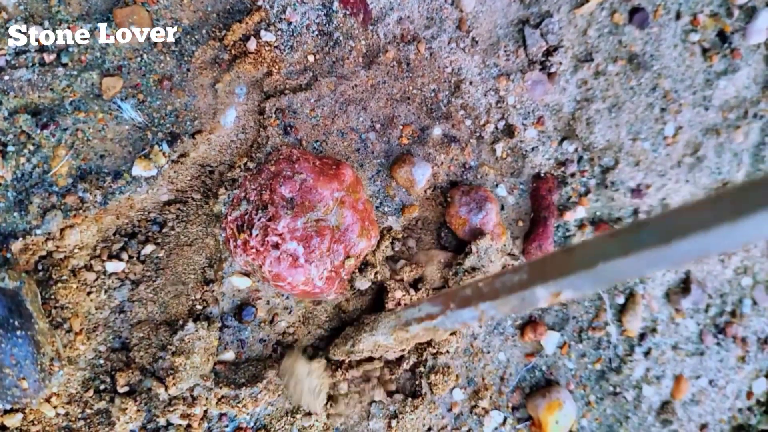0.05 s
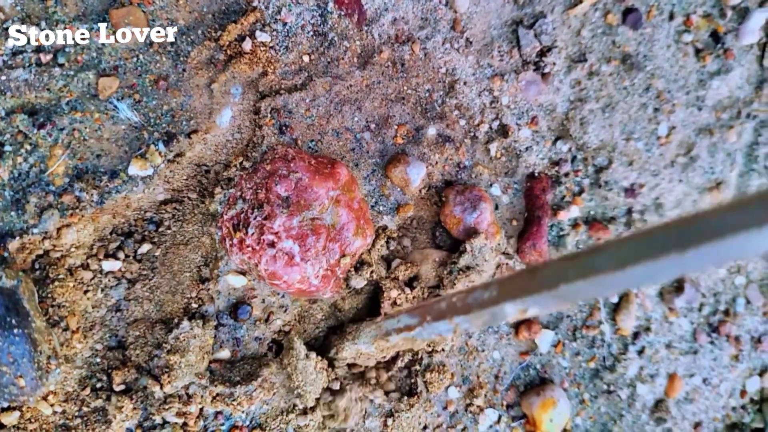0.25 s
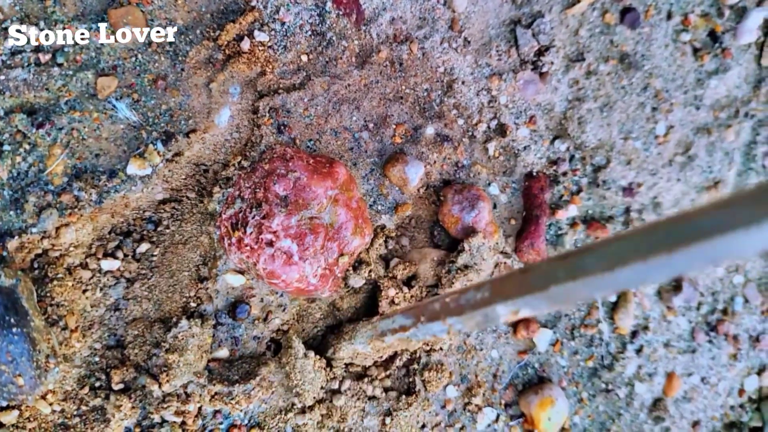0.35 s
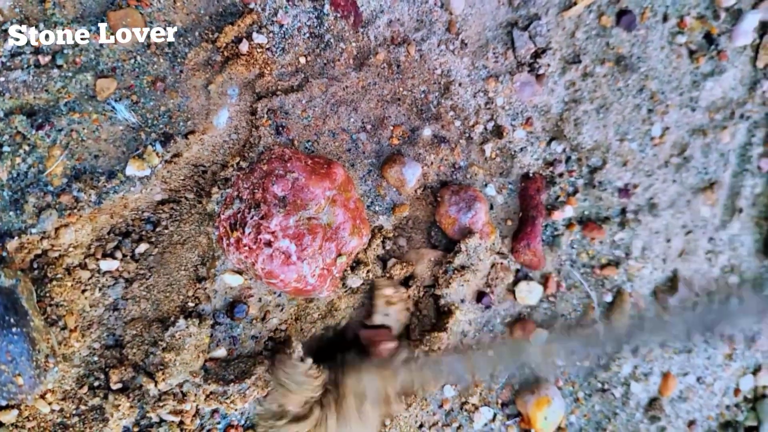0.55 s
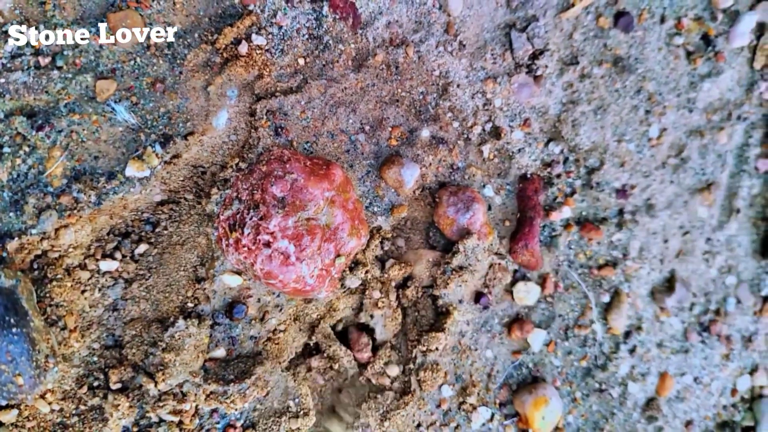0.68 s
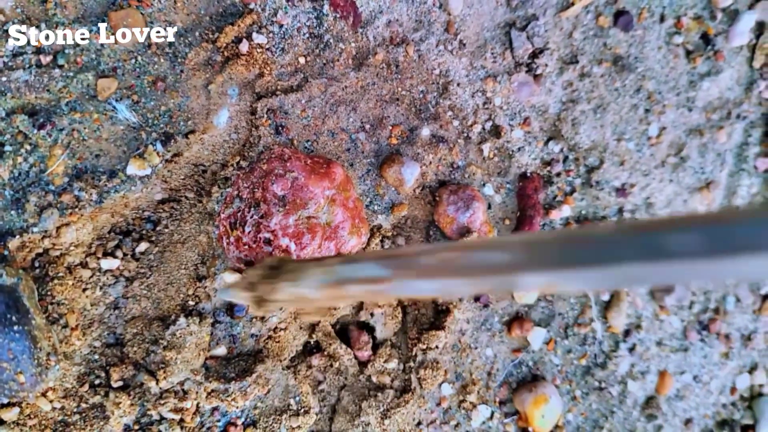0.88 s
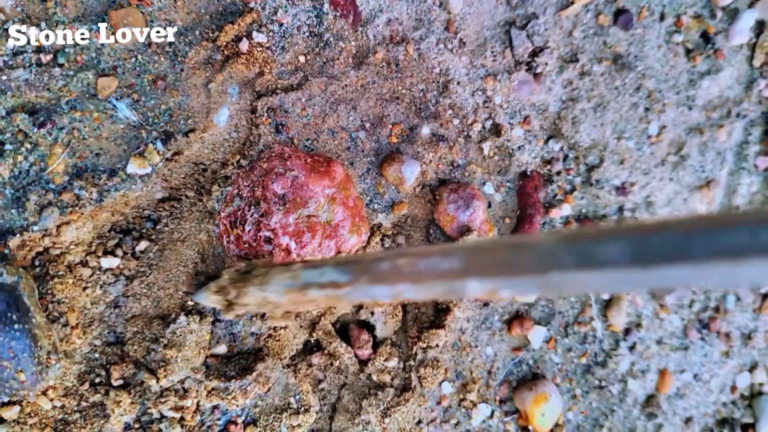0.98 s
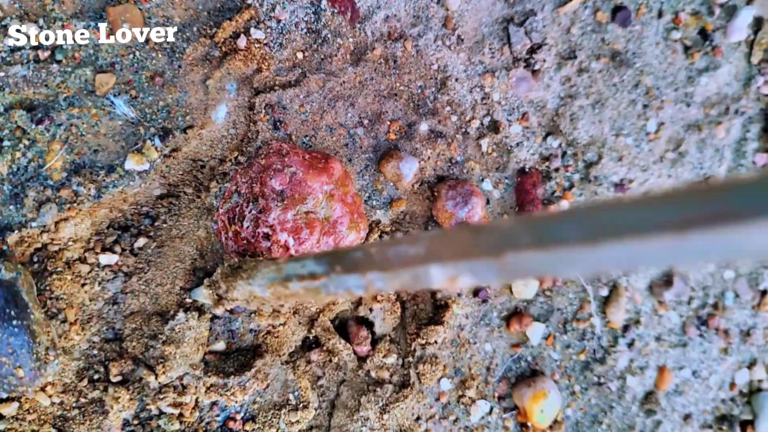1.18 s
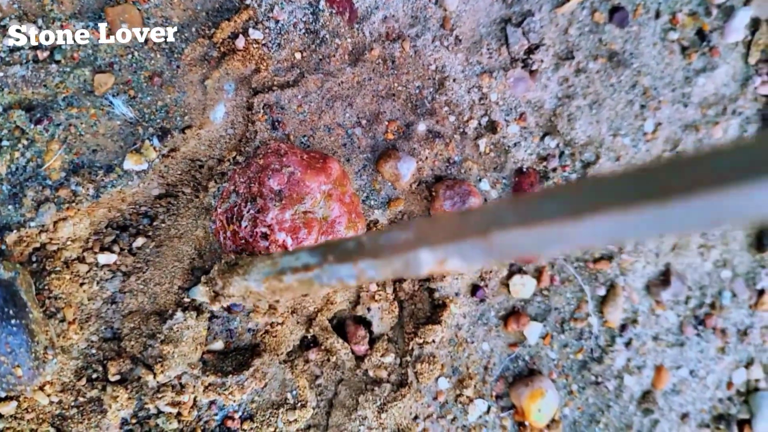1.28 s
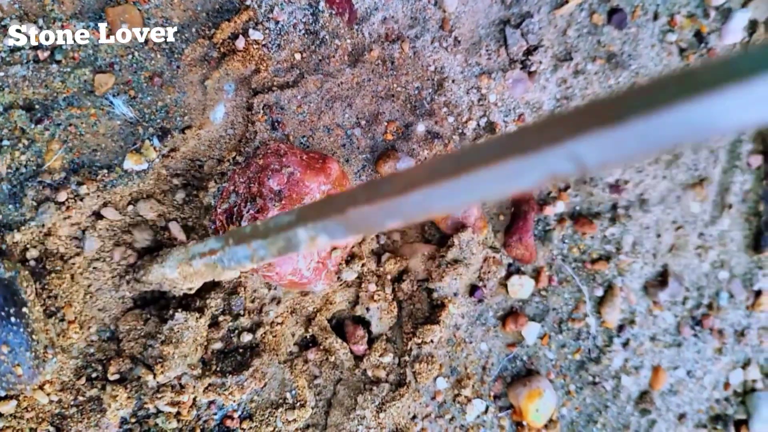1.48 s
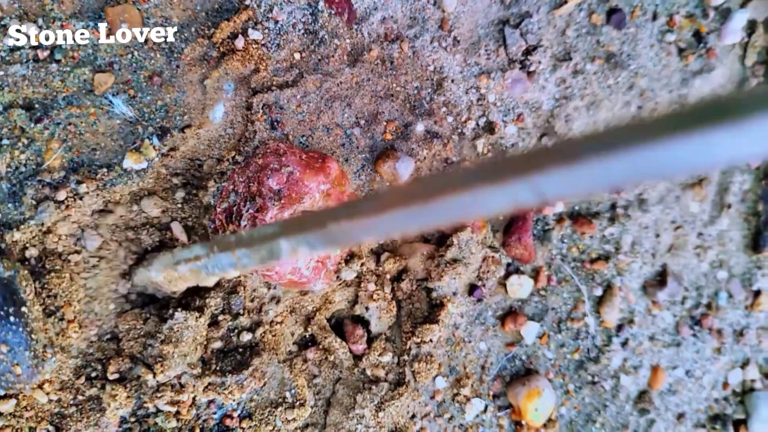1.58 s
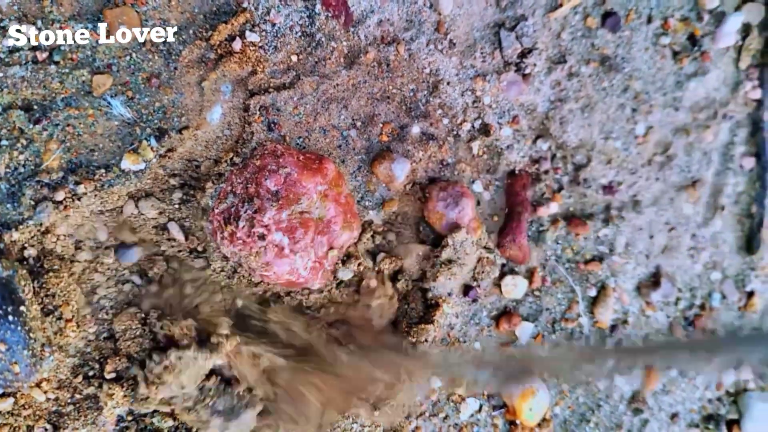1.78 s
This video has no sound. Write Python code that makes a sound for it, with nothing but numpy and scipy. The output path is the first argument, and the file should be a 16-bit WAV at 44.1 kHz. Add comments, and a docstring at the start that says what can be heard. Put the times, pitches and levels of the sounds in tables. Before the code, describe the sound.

Close digging with a metal rod in sandy ground: two pairs of sharp, gritty strikes with soft thuds, about a second apart. Between them the tip drags quietly, clumps break and loose grains tick down, against quiet outdoor air.

```python
"""Outdoors, close up: a steel rod digs in damp, gritty sand.
It stabs four times, each a few hard, ringing contacts with grit over a dull thud of the ground.
In between, the tip drags and judders through the sand, clods crumble with a hollow note,
and loose grains tick and trickle down. Still air and two faint whistles lie behind."""
import sys
import numpy as np
from scipy import signal
from scipy.fft import rfft, irfft
from scipy.io import wavfile
from scipy.ndimage import uniform_filter1d

SR = 44100
rng = np.random.default_rng(int(sys.argv[2]) if len(sys.argv) > 2 else 0)


def generate_wav(sig):
    """Save sig (samples, or channels by samples) to the path in sys.argv[1] as 16-bit PCM at SR."""
    pcm = np.round(np.clip(np.atleast_2d(sig).T, -1, 1) * 32767).astype(np.int16)
    wavfile.write(sys.argv[1], SR, pcm)


N = 81585
TIME = np.arange(N) / SR

# the ground gives under each stab: (time [s], push level [dB], push length [s], spring-back [Hz],
# knock level [dB], knock pitch [Hz], loose sand that the tip meets first [dB])
STAB_THUDS = [(0.2314, -24.5, 0.0072, 22.04, -29.5, 617, -33.5),
              (0.4202, -13.5, .006, 29.92, -23, 918, -40.5), (1.3029, -15.5, 0.0064, 27.56, -41, 246, -34),
              (1.5577, -12.5, 0.00513, 36, -33.5, 703, -39)]
# the rod's modes, damped by the sand: (pitch [Hz], level [dB], t60 [s])
ROD_MODES = [(624, -29, 0.01), (963, -27, 0.018), (1239, -23, .016), (1790, -23, 0.0053),
             (3184, -22.5, 0.0033), (5596, -21, 0.0048), (9320, -23, 0.0083)]
# thin, bright tone of a landing grain: (frequency [Hz], level [dB])
TICK_SPECTRUM = [(900, -46), (2000, -36), (4400, -17), (6100, -0.5), (7400, -12.5), (9600, 1.5),
                 (11500, -8), (14000, -5), (15500, -1)]


def from_db(db):
    return 10 ** (np.asarray(db) / 20)


def rms_one(x):
    return x / np.sqrt(np.mean(x ** 2) + 1e-20)


def colour(x, spectrum):
    """Gives a white source the spectrum, at the same power."""
    size = 4096
    hz, db = np.transpose(spectrum)
    bins_hz = np.maximum(np.arange(size // 2 + 1) * SR / size, 1)
    gain = from_db(np.interp(np.log(bins_hz), np.log(hz), db)) * np.minimum(bins_hz / hz[0], 1)
    # minimum phase keeps the attacks sharp
    cepstrum = irfft(np.log(gain))
    cepstrum[1:size // 2] *= 2
    cepstrum[size // 2 + 1:] = 0
    taper = np.fft.fftshift(np.hanning(size))
    impulse = (irfft(np.exp(rfft(cepstrum))) * taper)[:size // 2]
    return signal.fftconvolve(x, impulse / np.sqrt(np.sum(impulse ** 2)))[:N]


def dying(start, decay):
    """Instant attack, exponential tail."""
    return (TIME >= start) * np.exp(-np.maximum(TIME - start, 0) / decay)


def swell(start, length):
    """Half-sine rise and fall."""
    return np.sin(np.pi * np.clip((TIME - start) / length, 0, 1))


def ring(start, hz, t60):
    """One damped mode, struck once."""
    return dying(start, t60 / np.log(1000)) * np.sin(2 * np.pi * hz * (TIME - start))


def grains(per_s, spread_db):
    """Random clicks of uneven size; rms 1."""
    sizes = from_db(spread_db * np.minimum(rng.exponential(1, N), 4)) * rng.choice([-1, 1], N)
    return rms_one(sizes * (rng.random(N) < per_s / SR))


def stabs():
    """The tip enters loose sand; each contact clicks, rings, crushes grit and throws up a little sand."""
    # hard contacts of the tip, a few per stab:
    # (time [s], click [dB], crunch [dB], crunch decay [s], ring level [dB], ring pitch [Hz])
    contacts = [(.2302, 1, -7, 0.001, -11, 2082), (.2350, -8, -12.5, 0.0016, -9, 1920),
                (.4208, 2.5, -18, 0.001, -13, 1580), (.4221, -7.5, -9.5, 0.0011, -12.5, 2410),
                (0.424, -5, -29, 0.00077, -18, 1666), (.4247, -14.5, -16.5, 0.0014, -22.5, 958),
                (1.3014, 3, -19.5, 0.0026, -14.5, 2460), (1.3105, -11.5, -24, .002, -14, 1766),
                (1.3150, -16, -35.5, 0.0067, -24, 1403), (1.5576, -1.5, -18.5, 0.0013, -12.5, 2367),
                (1.5588, -41, -14, 0.00052, -17, 1300), (1.5623, -3, -15.5, 0.0015, -19.5, 1650),
                (1.5634, -30, -16, 0.00083, -18, 2350)]
    # tone of the tip's click and of crushed grit: (frequency [Hz], level [dB])
    click_spectrum = [(100, -1.5), (500, -8.5), (1500, 2), (3500, 6), (7000, -3), (9500, -11), (16000, -1)]
    crunch_spectrum = [(150, -28.5), (250, -10.5), (359, -8.5), (913, -18), (1380, -17), (1590, -3),
                       (2060, -2), (2800, -8), (3450, -8), (5600, -16), (7380, -20), (9560, -13),
                       (10400, -15.5), (14500, -22.5), (15500, -38)]
    spray_db, entry_rise_s = -33, 0.0067
    clicks, crush, tip_ring, spray = np.zeros((4, N))
    for start, click_db, crunch_db, decay, ring_db, hz in contacts:
        clicks[int(start * SR)] += from_db(click_db)
        crush += from_db(crunch_db) * dying(start, decay)
        spray += from_db(crunch_db + spray_db) * dying(start, decay=0.0072)
        tip_ring += from_db(ring_db) * ring(start, hz, t60=0.014)
    for start, *_, entry_db in STAB_THUDS:   # loose sand builds into each hit
        spray += from_db(entry_db) * (TIME < start) * np.exp(-np.abs(TIME - start) / entry_rise_s)
    rod = sum(from_db(db) * ring(0, hz, t60) for hz, db, t60 in ROD_MODES)
    rod_ring = signal.fftconvolve(clicks, rod)[:N]
    grit = crush * grains(per_s=9000, spread_db=-1.5) + spray * grains(per_s=9000, spread_db=1.5)
    return colour(clicks, click_spectrum) + rod_ring + colour(grit, crunch_spectrum) + tip_ring


def ground_thuds():
    """Each stab pushes the ground, which knocks, springs back, shudders and sways to rest."""
    # dull rumble of shuddering soil: (frequency [Hz], level [dB])
    soil_spectrum = [(40, -11), (80, -4.5), (170, 0.5), (260, -4), (600, -24.5), (2000, -59.5)]
    sway_db, creep_db, shudder_db = -13, -21, -13   # relative to the push
    thuds, shudder = np.zeros((2, N))
    for start, db, length, spring_hz, knock_db, knock_hz, _ in STAB_THUDS:
        push = from_db(db) * swell(start, length)
        spring = signal.sosfilt(signal.butter(2, spring_hz, "high", fs=SR, output="sos"), push + 1e-18)
        sway = from_db(db + sway_db) * ring(start, hz=34, t60=0.11)
        # the pressed soil creeps back slowly
        creep = from_db(db + creep_db) * (dying(start, decay=0.043) - dying(start, decay=0.0099))
        knock = from_db(knock_db) * ring(start, knock_hz, t60=0.029)
        thuds += spring - sway + creep + knock
        shudder += from_db(db + shudder_db) * dying(start, decay=0.009)
    return thuds + shudder * colour(rng.standard_normal(N), soil_spectrum)


def drags():
    """Dense sand grains slip past the tip, juddering, and stop as it comes free."""
    # pulls through the sand: (start [s], end [s], start level [dB], end level [dB], treble shelf [dB])
    strokes = [(0, 0.028, -43, -46.5, -0.5), (0.033, 0.035, -44, -41, -2), (0.042, 0.057, -54, -64, -1.5),
               (0.277, 0.376, -63.5, -77, -5.5), (0.471, 0.575, -74.5, -59, 3),
               (0.624, 0.757, -84.5, -81.5, 3.5), (0.95, 0.999, -68.5, -62, -8),
               (1.138, 1.284, -78, -79.5, -10), (1.326, 1.445, -69, -80.5, 5),
               (1.599, 1.738, -66, -50, -4.5), (1.745, 1.765, -57, -48, -5),
               (1.76, 1.769, -50.5, -47, -0.5), (1.795, 1.827, -65, -81.5, 1.5)]
    # rasp of sliding sand: (frequency [Hz], level [dB])
    sand_spectrum = [(150, -1), (300, -5.5), (600, -4), (1050, -2), (1450, -15.5), (1900, -0.5),
                     (2650, -17.5), (3200, -11), (4100, -14.5), (5000, -12.5), (5800, -8.5), (7300, -18.5),
                     (8000, -13.5), (9100, -2), (9900, -10.5), (11800, -7.5), (13800, -8.5), (15500, -8)]
    attack_s, release_s, judder_db, shelf_hz, rod_db = 0.001, 0.00385, 1.5, 4860, -10.5
    body, treble = np.zeros((2, N))
    for start, end, start_db, end_db, treble_db in strokes:
        attack = np.clip((TIME - start) / attack_s, 0, 1)
        release = np.exp(-np.maximum(TIME - end, 0) / release_s)
        stroke = attack * release * from_db(np.interp(TIME, [start, end], [start_db, end_db]))
        body += stroke
        treble += stroke * from_db(treble_db)
    judder = rms_one(uniform_filter1d(rng.standard_normal(N), size=220))
    slips = from_db(judder_db * judder) * grains(per_s=6700, spread_db=3)
    coarse = signal.sosfilt(signal.butter(1, shelf_hz, fs=SR, output="sos"), slips)
    grit = body * coarse + treble * (slips - coarse)
    return colour(grit, sand_spectrum) + from_db(rod_db) * rod_singing(grit)


def rod_singing(grit):
    """Grit rubs the rod's upper modes into a metallic sheen, at the grit's own power."""
    sheen = np.zeros(N)
    for hz, db, _ in ROD_MODES[3:]:
        b, a = signal.iirpeak(hz, Q=25, fs=SR)
        sheen += from_db(db) * signal.lfilter(b, a, grit + 1e-18) / np.sqrt(hz)
    return rms_one(sheen) * np.sqrt(np.mean(grit ** 2))


def clods():
    """Knocked clods crumble in short bursts, each with a hollow note of its own."""
    # breaking clods: (time [s], crumble level [dB], decay [s], note level [dB], note pitch [Hz])
    bursts = [(.001, -72, 0.018, -38.5, 301), (0.032, -53, 0.0022, -39.5, 1950),
              (.311, -82, 0.0081, -54, 564), (0.316, -82, 0.0077, -56.5, 880),
              (.679, -63.5, 0.0013, -58.5, 1260), (.846, -46.5, 0.0026, -53.5, 2055),
              (0.877, -44.5, 0.0019, -42.5, 790), (.889, -46, 0.0074, -43, 482),
              (.904, -44, 0.0022, -62, 485), (0.913, -51.5, 0.011, -49.5, 398),
              (.934, -47, 0.0039, -44.5, 668), (1.055, -52, 0.0078, -52, 677),
              (1.066, -50.5, 0.0035, -51.5, 787), (1.288, -43.5, 0.016, -47.5, 700),
              (1.34, -80, 0.0018, -41.5, 300)]
    # earthy tone of the crumble: (frequency [Hz], level [dB])
    clod_spectrum = [(180, -38), (300, -1.5), (446, -11.5), (600, -4.5), (756, 0.5), (1300, -7.5),
                     (1490, -18), (1750, -4.5), (2560, -39), (3180, -7.5), (3810, -38.5), (4280, -53.5),
                     (5660, -9), (6900, -64), (7750, -27.5), (9140, -14.5), (11000, -35), (14300, -21),
                     (15500, -40)]
    note_width_hz = 61
    crumble, hollow = np.zeros((2, N))
    for start, db, decay, note_db, hz in bursts:
        fall = dying(start, decay)
        crumble += from_db(db) * fall
        b, a = signal.iirpeak(hz, hz / note_width_hz, fs=SR)
        note = signal.lfilter(b, a, fall * rng.standard_normal(N) + 1e-18)
        hollow += from_db(note_db) * rms_one(note) * np.sqrt(np.mean(fall ** 2))
    return colour(crumble * grains(per_s=10000, spread_db=2.5), clod_spectrum) + hollow


def ticks():
    """Pinches of loose grains land with a thin, bright tick and faintly ring the rod."""
    # grains landing: (time [s], tick level [dB], rod ring level [dB])
    landings = [(0.082, -65, -73.5), (0.137, -74, -78), (0.635, -82.5, -93), (.650, -69, -77.5),
                (.680, -58, -64), (.705, -64, -85), (0.712, -54, -78), (.730, -53.5, -90),
                (0.739, -49, -75), (1.511, -59, -79)]
    decay_s = 0.0024
    fall = sum(from_db(db) * dying(start, decay_s) for start, db, _ in landings)
    touch = sum(from_db(db) * dying(start, decay_s) for start, _, db in landings)
    grit = grains(per_s=5000, spread_db=6)
    return colour(fall * grit, TICK_SPECTRUM) + rod_singing(touch * grit)


def trickle():
    """Sparse single grains tick down the sides of the hole."""
    # runs of falling sand: (start [s], end [s], level [dB])
    runs = [(.52, .58, -68), (.62, .71, -74.5), (1.123, 1.26, -79), (1.68, 1.76, -68)]
    flow = sum(from_db(db) * ((TIME > start) & (TIME < end)) for start, end, db in runs)
    return colour(flow * grains(per_s=150, spread_db=3.5), TICK_SPECTRUM)


def whistles():
    """Thin tones swell and fade in the background."""
    # faint whistles: (start [s], end [s], pitch [Hz], level [dB])
    tones = [(.12, .20, 1470, -72), (0.088, 0.14, 780, -70.5)]
    return sum(from_db(db) * swell(start, end - start) * np.sin(2 * np.pi * hz * TIME)
               for start, end, hz, db in tones)


def air():
    """Still outdoor air: a soft, steady bed of low noise."""
    # dark tone of the air: (frequency [Hz], level [dB])
    air_spectrum = [(12, -30.5), (20, 5.5), (64, 2), (245, -5), (1040, -15.5), (2030, -22.5), (3000, -30),
                    (5380, -35.5), (6910, -37.5), (9130, -29.5), (15500, -33)]
    return from_db(-70) * colour(rng.standard_normal(N), air_spectrum)


def scene():
    """Digging over a quiet bed of air, in mono."""
    bed = air()
    digging = stabs() + ground_thuds() + drags() + clods() + ticks() + trickle()
    return (digging + whistles() + bed)[None]


def record(dry):
    """Subsonic drift is removed, peaks are rounded, the top is cut."""
    low_cut_hz, ceiling, high_cut_hz = 8, 0.7, 15400
    centred = signal.sosfilt(signal.butter(1, low_cut_hz, "high", fs=SR, output="sos"), dry)
    rounded = ceiling * np.tanh(centred / ceiling)
    return signal.sosfilt(signal.ellip(10, 0.3, 80, high_cut_hz, fs=SR, output="sos"), rounded)


dry = scene()
out = record(dry)
generate_wav(out)
```